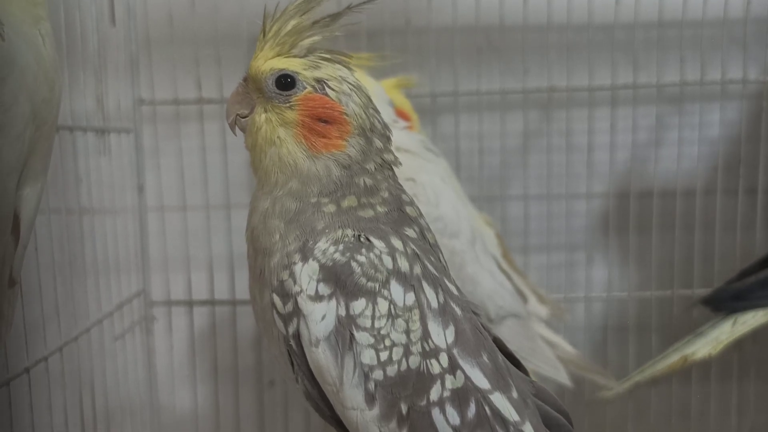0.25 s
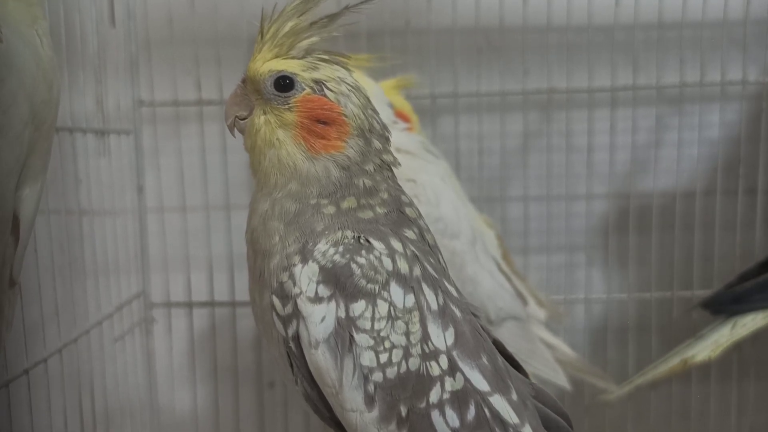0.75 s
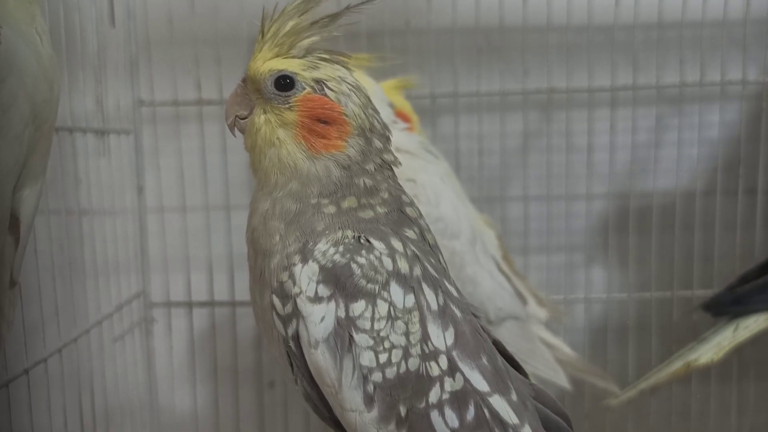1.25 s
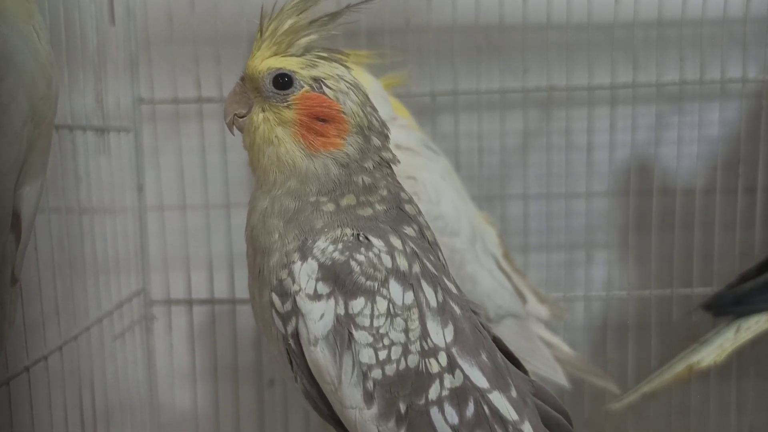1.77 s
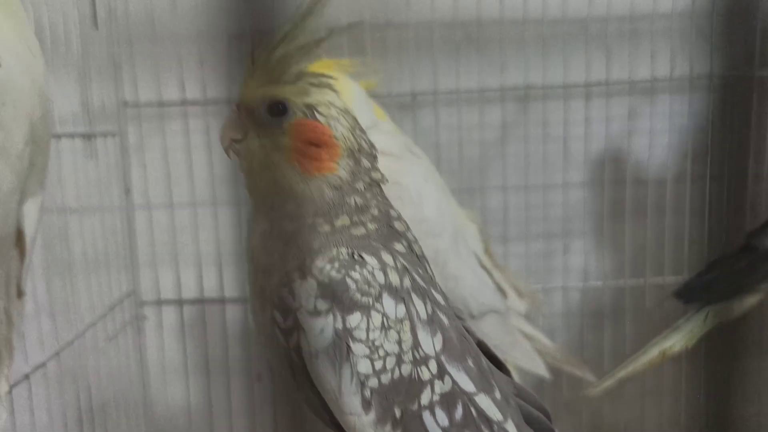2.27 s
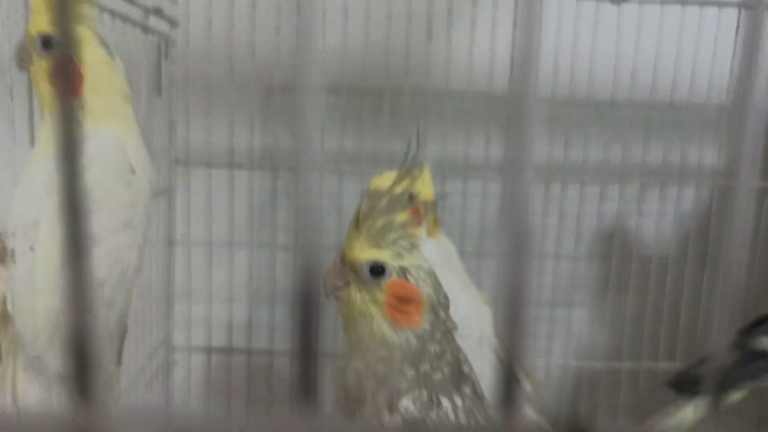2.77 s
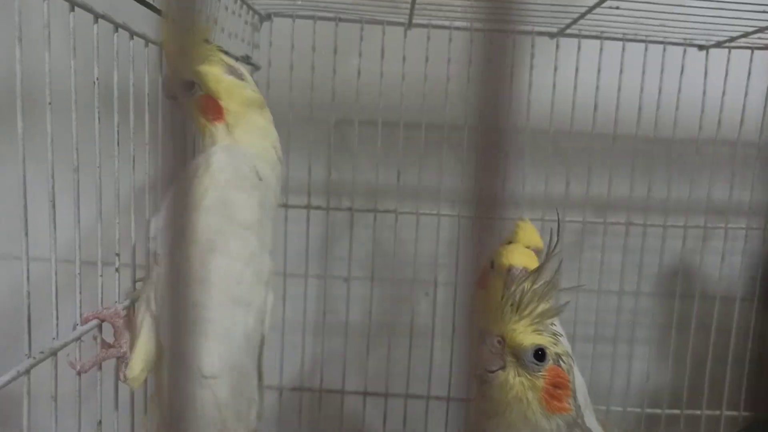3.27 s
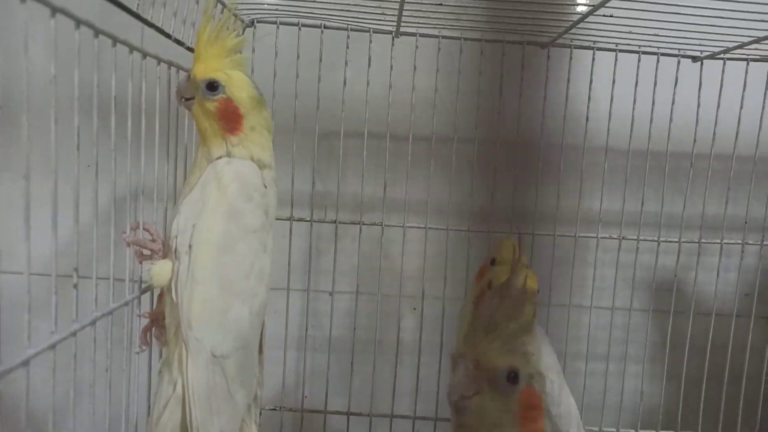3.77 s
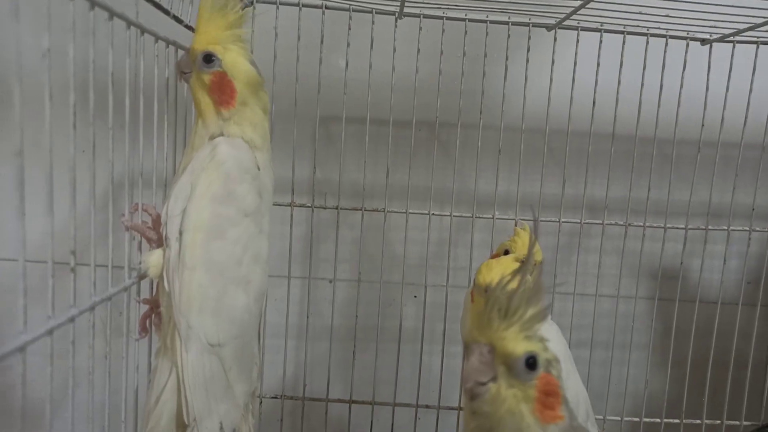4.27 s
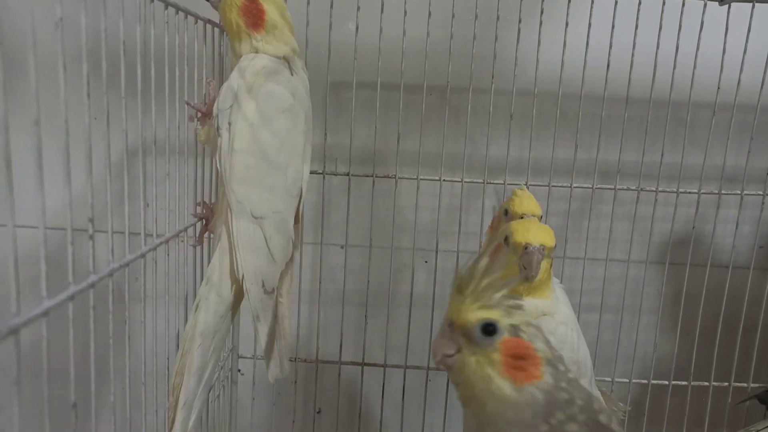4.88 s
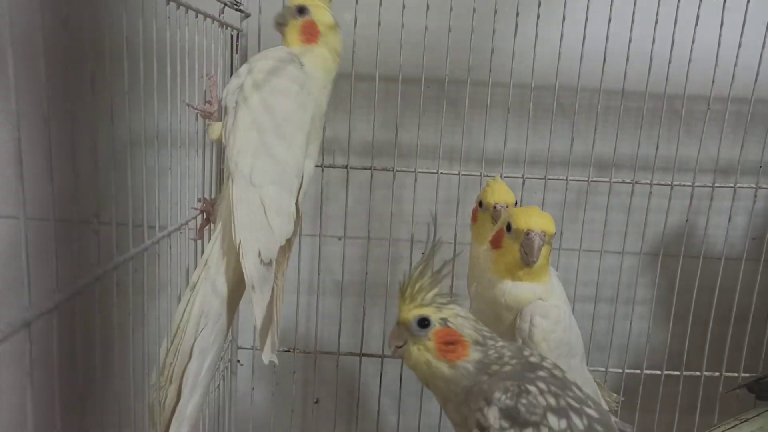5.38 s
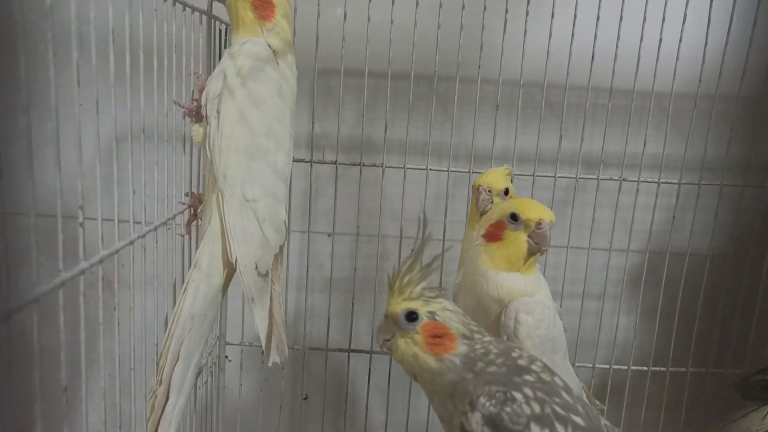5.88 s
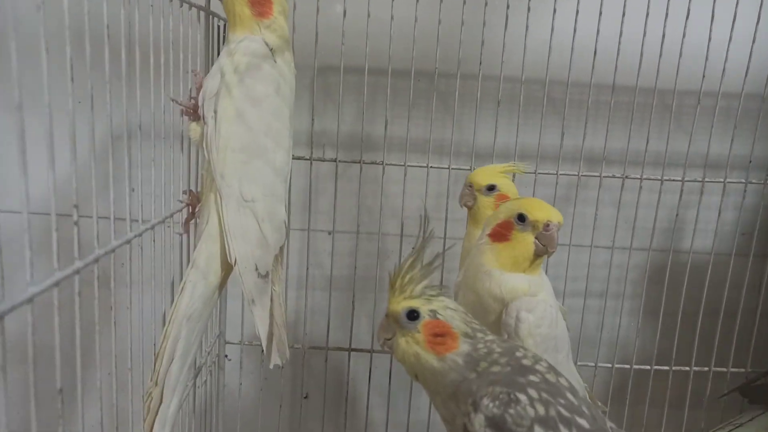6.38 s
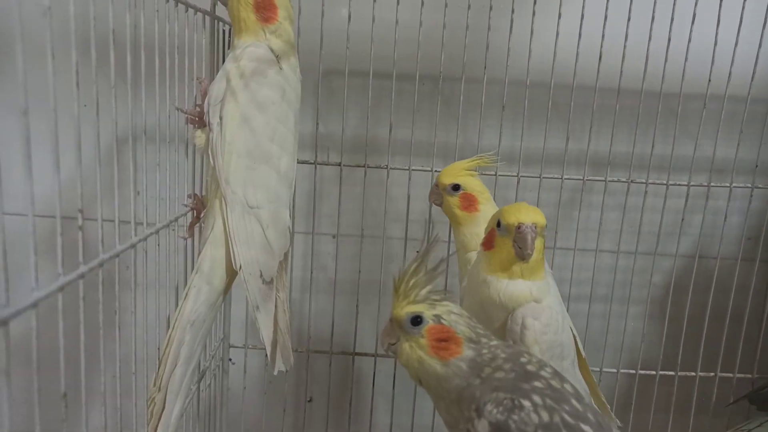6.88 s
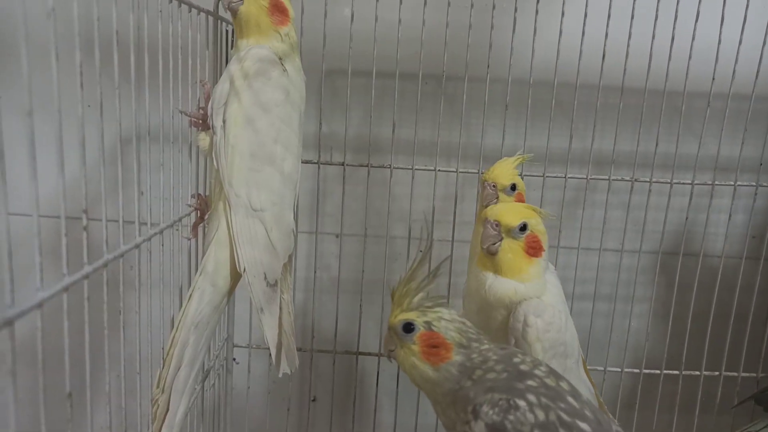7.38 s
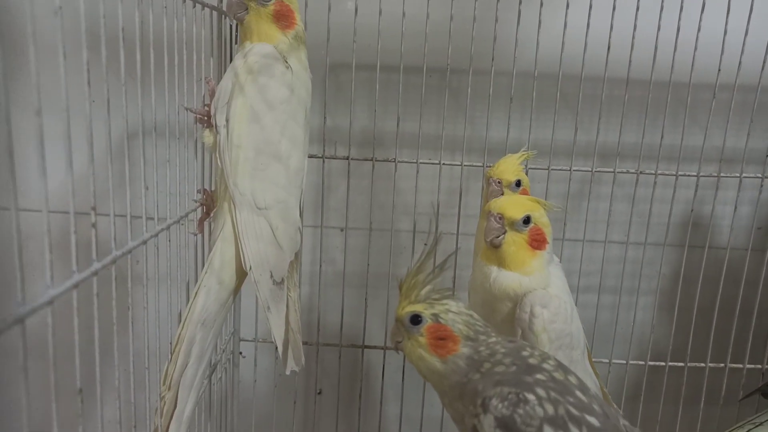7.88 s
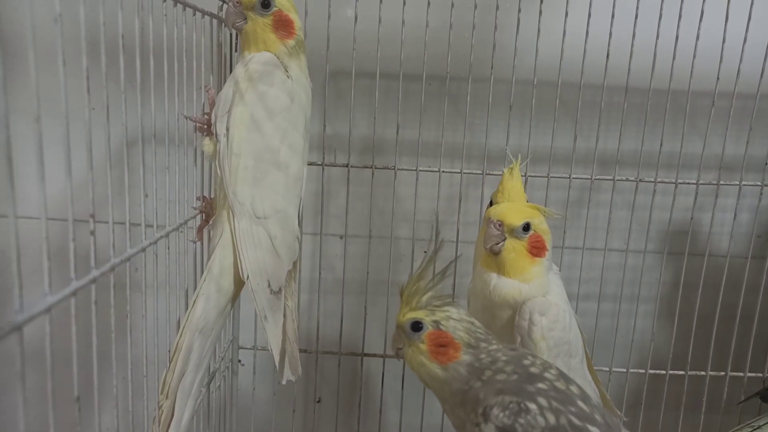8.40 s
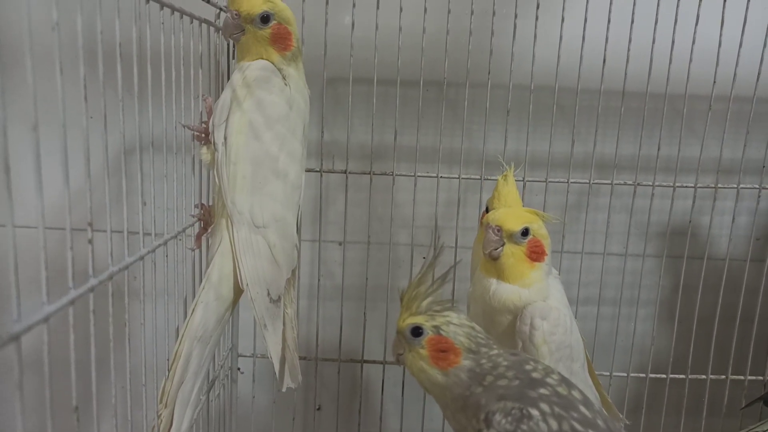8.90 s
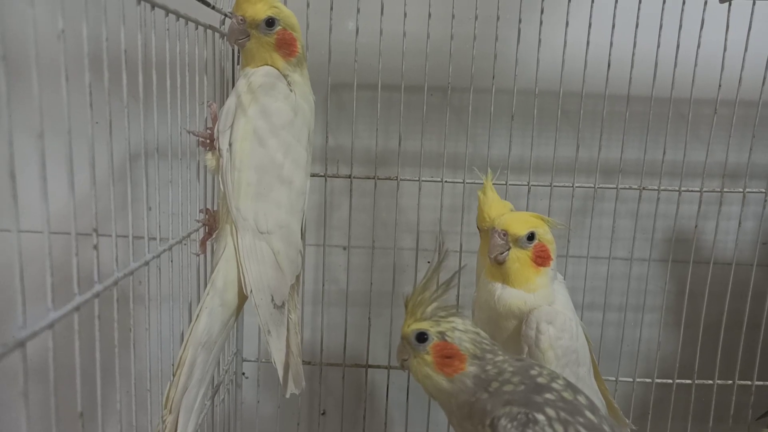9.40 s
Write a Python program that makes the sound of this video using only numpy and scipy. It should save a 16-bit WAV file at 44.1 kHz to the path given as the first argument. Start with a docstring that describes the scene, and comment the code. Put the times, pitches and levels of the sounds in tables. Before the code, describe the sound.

From 0 s several cockatiels call in a bare, reverberant room: clean whistles gliding around 1.5 to 4 kHz, overlapped by hoarse squawks and short bursts of bright hiss. At about 1 s a rising, fast-warbling trill joins, then louder calls near 1.7 s and a soft cage knock around 1.5 s. From roughly 2.1 to 3.1 s it falls quiet, with echoes fading, a light ringing knock at 2.4 s and faint low tones and weak peeps. At 3.2 s trills and sharp whistles return, scattered to 4.6 s, then crowd densely from 4.8 to 6.1 s, loudest and brightest near 5.3 s. A lull with faint low tones lasts until 7 s. Overlapping whistles resume; a dull low bang rolls at 7.8 s. Scattered chirps follow, two piercing ones near 8.9 s, then a pause and a last rising whistle at 9.5 s. Air, far birds and hiss continue throughout.

```python
"""Cockatiels call across one another in wire cages in a bare, echoing room.
From the start, clean whistles and hoarse squawks glide through a few harmonics, many along with short bursts of bright hiss.
After a second warbling trills join in, then soft knocks make the cages ring. A quiet spell follows with faint low tones.
Then the calls crowd in again and thin out; late on, one dull bang of low noise rolls through the room under the last calls.
Air, far birds and hiss, all made of noise, lie beneath it throughout."""
import sys
import numpy as np
from scipy import signal
from scipy.fft import rfft, irfft
from scipy.io import wavfile
from scipy.ndimage import uniform_filter1d

SR = 44100
rng = np.random.default_rng(int(sys.argv[2]) if len(sys.argv) > 2 else 0)


def transcribe(signal):
    """Save signal, clipped to [-1, 1], as a 16-bit WAV file at the path in sys.argv[1]."""
    frames = np.atleast_2d(signal).T
    limited = np.clip(frames, -1, 1)
    pcm = np.round(limited * 32767).astype(np.int16)
    wavfile.write(sys.argv[1], SR, pcm)


N = 425565   # length in samples


def from_db(db):
    """Turn decibels into a plain multiplier."""
    return 10 ** (np.asarray(db) / 20)


def rms_one(x):
    """Bring a signal to an average strength (RMS) of 1."""
    return x / np.sqrt(np.mean(x ** 2) + 1e-20)


def at_hz(points, hz):
    """Read a table of (Hz, value) at any frequency, on a logarithmic pitch scale."""
    table_hz, values = np.array(points).T
    return np.interp(np.log(hz + 1), np.log(table_hz), values)


def coloured(x, spectrum):
    """Make each frequency louder or softer by a (Hz, dB) table."""
    size = x.shape[-1]
    gain = from_db(at_hz(spectrum, np.fft.rfftfreq(size, 1 / SR)))
    return irfft(rfft(x) * gain, size)


def wobble(rate_hz, size):
    """Random wandering no faster than about rate_hz: low-passed noise of spread 1."""
    sos = signal.butter(3, rate_hz, fs=SR, output="sos")
    settled = signal.sosfilt(sos, rng.standard_normal(size + 4000))[4000:]
    return rms_one(settled)


def puff(start, length):
    """A loudness curve with a quick rise and a rounded fall."""
    age = np.clip(np.arange(N) / SR - start, 0, None) / max(length, .001)
    return (1 - np.exp(-age * 5)) * np.exp(-age ** 2)


# How much the left and right noise agree. Each row: frequency in Hz, likeness from 0 (unrelated) to 1 (same).
LIKENESS = [(60, 0.77), (290, 0.8), (700, 0.14), (1200, 0.16)]


def stereo_noise(size):
    """Two noise channels that agree in the bass and part in the treble."""
    mid, side = rfft(rng.standard_normal((2, size)))
    alike = np.clip(at_hz(LIKENESS, np.fft.rfftfreq(size, 1 / SR)), 0, 1)
    pair = np.sqrt(1 + alike) * mid + np.sqrt(1 - alike) * side * [[1], [-1]]
    return irfft(pair, size) / np.sqrt(2)


WARBLE_GROWS_S = .05   # time from none to full depth; a warble starts about a quarter of the way there
WARBLE_SNAP = 2.0      # the pitch dwells high and low and snaps between


def warble(age, depth, rate_hz, dip_loss_db):
    """The pitch swings up and down, and the loudness drops with each dip; gives pitch factor and loss in dB."""
    grown = np.clip(age / WARBLE_GROWS_S + 0.26, 0, 1)
    swing = -np.cos(2 * np.pi * rate_hz * age)      # starts at a dip
    swing = np.tanh(WARBLE_SNAP * swing) / np.tanh(WARBLE_SNAP)
    return 1 + depth * grown * swing, dip_loss_db * (1 - swing) / 2


# How the throat colours the voice. Each row: frequency in Hz, gain in dB.
THROAT = [(1200, -4), (1800, -5.5), (2500, -5), (3500, 0.5), (4300, 2.5), (5000, -11.5), (6500, -8.5),
          (8000, -21), (12000, -33.5), (16000, -36.5)]
# Overtones weaken as the pitch climbs above its turn and as the note goes on past it.
PURER_PER_OCTAVE_DB, PURER_PER_S_DB = 4, 29.5
HIGHER_STEP_DB = 1   # gain per harmonic above the third, before the throat


def harmonic_heights(k, glide, since_turn, turn_hz, second_db, third_db):
    """The syrinx sets the strength of each harmonic and the throat reshapes it; total power stays even."""
    purer_db = PURER_PER_OCTAVE_DB * np.log2(glide / turn_hz) + PURER_PER_S_DB * since_turn
    lower_db = (second_db - purer_db) * (k - 1)
    upper_db = third_db - purer_db + HIGHER_STEP_DB * (k - 3)
    source_db = np.where(k > 2, upper_db, lower_db)
    heights = from_db(source_db + at_hz(THROAT, k * glide)) * (k * glide < 11000)
    return heights / np.sqrt(np.sum(heights ** 2, axis=0))


ARCH_DB = 3.5       # a note is this much louder at its turn than along the line from start to end
BREATH_DB = -25.5   # air noise riding on a note, between its harmonics; a strained voice has more


def calls(notes, rough, jitter, edge_s, shake_hz):
    """The syrinx gives harmonics on a gliding pitch; hoarseness shakes both loudness and pitch.
    Returns what feeds the room and what is heard directly."""
    out = np.zeros((2, N))
    shake, waver = wobble(shake_hz, N), wobble(92.0, N)
    breath = from_db(BREATH_DB) * wobble(1236, N)
    k = np.arange(1, 8)[:, None]      # harmonic numbers
    for (start, turn, length, start_hz, turn_hz, end_hz, level_db, swell_db,
         second_db, third_db, near_db, *warbling) in notes:
        s = start + np.array([0, np.clip(turn, .002, length - .002), length])
        first, last = int((s[0] - edge_s) * SR), int((s[-1] + edge_s) * SR)
        i = np.arange(max(first, 0), min(last, N))
        t = i / SR
        glide = np.interp(t, s, [start_hz, turn_hz, end_hz])
        glide = uniform_filter1d(glide, size=500, mode="nearest")      # rounds the turn
        dip_db = 0
        if warbling:
            pitch_factor, dip_db = warble(t - start, *warbling)
            glide = glide * pitch_factor
        heights = harmonic_heights(k, glide, t - s[1], turn_hz, second_db, third_db)
        # a pressed, bright voice is the less steady one
        strain = 1 + .9 * np.minimum(heights[1] / heights[0], 1)
        phase = 2 * np.pi * np.cumsum(glide * (1 + jitter * strain * waver[i])) / SR
        wave = np.sum(heights * np.sin(k * phase), axis=0)
        fade = np.clip(np.minimum(t - s[0], s[-1] - t) / edge_s + 1, 0, 1) ** 2
        shape_db = np.interp(t, s, [-ARCH_DB - swell_db / 2, 0, -ARCH_DB + swell_db / 2])
        loudness = np.sqrt(2) * from_db(level_db + shape_db - dip_db) * fade
        unsteady = 1 + rough * np.sqrt(strain) * shake[i] + strain * breath[i]
        out[:, i] += loudness * unsteady * wave * from_db([[0], [near_db]])
    return out


# Clean whistles. Each row: start in seconds, turn after seconds, length in seconds,
# pitch at start, turn and end in Hz, level in dB, swell from start to end in dB,
# second harmonic in dB, third harmonic in dB, nearness as extra direct sound in dB.
WHISTLES = [ (0, 0.058, 0.16, 3438, 3353, 3223, -24, -1.5, -9, -32, 7.5),
            (.052, 0.052, 0.15, 2354, 2159, 2061, -24, -7, -8.5, -9.5, -6),
            (.38, 0.025, 0.044, 1626, 1848, 1926, -26, -4.5, -6, -6, 2.5),
            (.425, 0.025, 0.056, 1893, 2564, 2590, -29.5, -17.5, -14.5, -8.5, 3),
            (.765, 0.071, 0.084, 2847, 2417, 2266, -25.5, 9, -20, -19.5, -2.5),
            (.875, 0.021, 0.044, 2257, 1808, 1196, -36.5, -1, -30, -30, 5),
            (.912, 0.013, 0.044, 2800, 2940, 3080, -31.5, 6, -14, -23, -11),
            (.942, 0.02, 0.051, 3130, 3200, 3010, -22.5, -9, -12.5, -21, -5),
            (.98, 0.027, 0.048, 2300, 2224, 2015, -27, 2, -12.5, -25, 5),
            (1.26, 0.015, 0.034, 2590, 2305, 1950, -31, 2, 1, -2.5, 15),
            (1.43, 0.052, 0.11, 1499, 1690, 2155, -27.5, 1.5, -2, 0.5, -0.5),
            (1.54, 0.024, 0.034, 2770, 2985, 3070, -27.5, 3, -7, 5, -9),
            (1.652, 0.036, 0.075, 1903, 2129, 2134, -18, 0.5, 0, 4, -1),
            (1.735, 0.05, 0.084, 2128, 2125, 2070, -21.5, 7.5, 0.5, -13, -2),
            (1.82, 0.041, 0.069, 2700, 2437, 2226, -28, 13.5, -22, -11, -4),
            (3.14, 0.0076, 0.1, 1490, 1396, 1417, -49, -13, -6, -17, 2),
            (3.5, .02, 0.031, 3450, 3600, 3606, -19, 3, -7.5, -41, -1),
            (4.13, 0.025, 0.037, 1903, 1802, 1700, -31.5, 0, -14.5, -16, 6.5),
            (4.145, 0.014, 0.027, 3840, 3285, 2830, -36.5, -5.5, -9.5, -11, 3),
            (4.23, .025, 0.032, 1270, 1294, 1298, -40, 2.5, -32, -36, 1),
            (4.818, 0.042, 0.064, 1472, 1866, 2293, -25.5, 11.5, -2.5, -1, -6),
            (4.88, 0.027, 0.065, 2955, 2933, 2820, -30, 3, -22.5, -19, 2),
            (4.95, 0.033, 0.091, 1910, 1618, 1743, -31.5, 6.5, -14.5, -8.5, 1.5),
            (5.05, 0.032, 0.063, 1794, 2162, 1990, -17.5, -10.5, 2.5, -3, -7.5),
            (5.113, 0.077, .13, 2015, 1997, 1825, -22.5, -4.5, 2, -8, 2.5),
            (5.274, 0.027, 0.058, 2364, 2660, 3050, -21, -9, 9, 4.5, 1.5),
            (5.327, 0.011, 0.028, 3403, 3494, 3800, -16.5, -5, -6.5, -24, -1.5),
            (5.349, 0.03, 0.0545, 3860, 3720, 3467, -17, -1.5, -15.5, -44, 0),
            (5.422, 0.018, 0.049, 3445, 3547, 3473, -20.5, -1.5, -25, -36, 5),
            (5.448, 0.021, 0.051, 2294, 2980, 3100, -21, 5.5, -14, -28, 2.5),
            (5.512, 0.024, 0.059, 2970, 3142, 3064, -23.5, 6, -17.5, -30, 5),
            (5.636, 0.044, 0.13, 1807, 1936, 1677, -26, 1, -22.5, -30, 6.5),
            (5.975, 0.024, 0.099, 2990, 3247, 2917, -16.5, -1.5, -14.5, -29, -4),
            (6.625, 0.021, 0.03, 2390, 2486, 2420, -38, -11, -19, -13.5, 5.5),
            (6.685, 0.024, 0.056, 2244, 2060, 1990, -48, -8, -25, -14, 3),
            (7.005, 0.026, 0.084, 1596, 1736, 1670, -35, -16, -25, -27.5, 2.5),
            (7.005, 0.083, 0.14, 2970, 2697, 2176, -28.5, 6, -19, -16, 2),
            (7.27, 0.051, 0.08, 1922, 2296, 2920, -23.5, 14, -12.5, -15, -2.5),
            (7.34, 0.085, 0.17, 3008, 3180, 2960, -22.5, -3.5, -11, -35, -0.5),
            (7.33, 0.064, 0.15, 1607, 1947, 2360, -23, -1, 1, -1.5, -17),
            (7.72, 0.097, .13, 3060, 2495, 2087, -28, 1, -18, -9, 2.5),
            (7.925, 0.011, 0.031, 3720, 3395, 3104, -25.5, 9, -16.5, -23, 1.5),
            (7.952, 0.035, 0.064, 2750, 2050, 1640, -32, -1, -11, -27, 5),
            (8.15, 0.017, 0.031, 1496, 1370, 1320, -42.5, 13, -27.5, -20, 2),
            (8.203, 0.032, 0.085, 1761, 2300, 1523, -27, -0.5, -23, -24, 4.5),
            (8.285, 0.018, 0.052, 2160, 2395, 2430, -22.5, -7.5, -29, -26.5, 8.5),
            (8.56, 0.03, 0.06, 1710, 1513, 1380, -37, -1, -41, -41, 4),
            (8.625, 0.04, 0.07, 1443, 2270, 1956, -35, -0.5, -27.5, -28, 7),
            (8.706, 0.019, 0.029, 2553, 3400, 3480, -31, 17, -12, -35, 0),
            (8.74, 0.0078, 0.016, 3410, 3264, 2770, -22, 14, -20.5, -37, 8),
            (8.872, 0.027, 0.059, 3750, 3154, 3450, -15, 3, -13, -28, 5),
            (8.93, 0.042, 0.086, 3450, 3828, 3872, -14.5, 1.5, -10.5, -16, -1),
            (9.12, 0.016, 0.027, 1366, 1304, 1210, -44, 4, -10, -11, 14),
            (9.34, 0.0098, 0.043, 1210, 1153, 1150, -50, -12, -26, -24, 9),
            (9.48, 0.064, 0.15, 1685, 2290, 2577, -22, 6.5, -3, -3.5, -3.5), ]
# Rising calls that warble. Each row: the columns of a whistle, then warble depth as a share of the pitch,
# warble rate in Hz, loudness lost at each dip of the pitch in dB.
TRILLS = [ (1.043, 0.054, 0.091, 1698, 1842, 2295, -27.5, 16, -12, -4.5, 8, 0.039, 55.8, 4),
          (1.133, 0.037, 0.075, 2294, 2422, 3220, -25.5, -9, -8, -13, 11.5, 0.055, 52.3, 6),
          (3.242, 0.058, 0.14, 1548, 1701, 2617, -26, 18.5, -7.5, -4, 6, 0.028, 52.2, 4),
          (3.379, 0.047, 0.11, 2920, 3130, 3162, -19, -3, -13.5, -39, 6, 0.108, 52.8, 1),
          (4.37, 0.046, .1, 1375, 1693, 2243, -29, 4, -15.5, -18, 7, 0.056, 57.9, 3),
          (5.764, 0.034, 0.064, 1977, 2322, 2453, -17, 11.5, -24.5, -36, 4.5, 0.095, 53.7, 10), ]


def whistles_and_trills():
    """Clean voices: the syrinx moves steadily, so loudness and pitch shake little."""
    return calls(WHISTLES + TRILLS, rough=.16, jitter=.005, edge_s=.004, shake_hz=150)


# Hoarse squawks. Each row: start in seconds, turn after seconds, length in seconds,
# pitch at start, turn and end in Hz, level in dB, swell from start to end in dB,
# second harmonic in dB, third harmonic in dB, nearness as extra direct sound in dB.
SQUAWKS = [ (0, 0.014, 0.029, 2358, 2244, 1904, -28, 11.5, -5.5, 2.5, -8),
           (0, 0.032, 0.062, 2920, 2780, 2650, -27.5, 1, -7, -18, 4.5),
           (.17, 0.015, 0.048, 2507, 2651, 2623, -22.5, -4, -13.5, -15.5, -3),
           (.437, 0.07, 0.16, 3130, 2862, 2773, -33.5, -10, -18, -15, 1),
           (1.98, 0.046, 0.084, 3220, 2256, 1595, -37.5, 11, -5, -34, -3),
           (1.99, 0.032, 0.056, 2300, 2216, 1880, -30.5, -9, -3, -7, 3),
           (2.562, 0.021, 0.023, 1540, 1443, 1330, -46.5, -12, -26, -20, 9),
           (2.67, 0.018, 0.023, 1290, 1307, 1290, -49.5, -11, -35, -17, 2),
           (2.8, 0.023, 0.095, 1388, 1394, 1302, -50, -12, -12, -20.5, 1),
           (2.91, 0.013, 0.028, 1614, 1795, 1980, -50, -10, -31.5, -12, 6.5),
           (3.02, 0.014, 0.035, 1283, 1343, 1380, -49.5, -24.5, -30, -33, -9),
           (3.47, 0.057, 0.12, 1700, 1905, 2440, -31, 17.5, -6, -5.5, 4),
           (3.57, 0.037, 0.076, 3193, 3227, 3150, -24, -14.5, -9, -39, -7),
           (3.64, 0.045, 0.11, 2000, 2449, 2212, -29.5, 11, -8.5, -6.5, 5),
           (3.93, 0.035, 0.061, 2050, 1856, 1743, -32, 0.5, -7, -3, -2),
           (3.98, .02, 0.021, 2304, 2335, 2300, -34.5, 3, 13, -16, 14.5),
           (4.03, 0.027, 0.057, 2300, 2348, 1569, -33, 5, -25, -25, 4.5),
           (5.39, 0.02, 0.052, 3250, 2296, 1715, -27.5, -7, -21.5, -9, -5),
           (6.02, 0.032, 0.052, 2932, 2278, 1560, -26.5, -27, -16, -29, -3),
           (6.12, 0.049, 0.098, 2150, 2335, 2376, -37.5, -1, -7, -7.5, 5),
           (7.1, 0.041, .11, 1750, 1970, 2300, -32, 8, -7.5, -1, -5),
           (7.17, 0.026, 0.083, 3100, 3270, 3220, -29, -5, -15, -28, -2),
           (7.44, 0.029, 0.086, 2490, 2494, 2550, -30.5, -1, -7, -10, 6),
           (7.9, 0.056, 0.065, 3096, 3460, 3240, -39, 18, 3.5, -28, -5),
           (8.915, 0.021, 0.055, 2190, 2260, 2320, -30.5, -8, 0.5, -15, 0), ]


def squawks():
    """Hoarse voices: loudness and pitch shake hard and fast."""
    return calls(SQUAWKS, rough=0.74, jitter=0.01415, edge_s=0.0074, shake_hz=400)


# Short bursts of bright hiss. Each row: start in seconds, level in dB (lowered by 10 below), length in seconds.
HISS_BURSTS = [(0.377, -20.5, 0.07), (0.804, -40.5, 0.063), (0.977, -31, 0.037), (1.06, -36, 0.065),
               (1.429, -29, 0.042), (1.631, -25, 0.04), (2.43, -51, 0.031), (2.654, -56, 0.036),
               (2.9, -49, 0.027), (3.235, -24.5, 0.05), (3.288, -28, 0.16), (3.988, -29, 0.059),
               (4.13, -27.5, 0.05), (4.376, -26.5, 0.089), (4.644, -22.5, 0.036), (4.826, -30.5, 0.062),
               (5.025, -32.5, 0.056), (5.27, -18.5, 0.048), (5.652, -28.5, 0.18), (5.769, -21.5, 0.066),
               (5.967, -19, 0.05), (7.008, -36.5, 0.19), (7.292, -35, .055), (7.7966, -42, 0.05),
               (8.278, -21.5, 0.046), (8.718, -25.5, 0.028), (8.859, -27.5, 0.034), (9.483, -36, 0.1)]
# Colour of the bursts. Each row: frequency in Hz, level in dB per Hz.
HISS_BURST_COLOUR = [(1000, -18), (3000, 3), (7000, -8), (12000, 11), (16000, 14)]
PATCHY_DB = 5   # how unevenly the narrow bands swell and fade


def hiss_bursts():
    """Short bursts of bright, patchy hiss, many along with loud calls: grainy noise in uneven narrow bands."""
    level = sum(from_db(db - 10.0) * puff(s, length) for s, db, length in HISS_BURSTS)
    grains = rng.standard_normal(N) * from_db(1.6 * wobble(300, N))
    grains = rms_one(coloured(grains, HISS_BURST_COLOUR))
    patches = from_db(PATCHY_DB * np.array([wobble(15.2, N) for _ in range(5)]))
    edges = np.geomspace(1000, 16500, 25)
    noise = np.zeros(N)
    for k, pair in enumerate(zip(edges, edges[1:])):
        sos = signal.butter(2, pair, "band", fs=SR, output="sos")
        noise += patches[k % 5] * signal.sosfilt(sos, grains)      # every fifth band shares a patch
    return level * rms_one(noise)


# Soft knocks on the cages. Each row: time in seconds, level in dB (raised by 7.5 below).
KNOCKS = [(1.487, -46), (2.443, -41.5), (4.05, -50), (5.199, -53)]
# Tones at which a cage rings. Each row: frequency in Hz, level in dB, time to fade by 60 dB in seconds.
CAGE = [(318, -1, 0.039), (506, -10.5, 0.019), (1800, -8.5, .012), (3730, 5, 0.0092)]


def knocks():
    """Each knock sets all the cage's tones ringing, each with a strength of its own."""
    s, knock_db = np.transpose(KNOCKS)
    scatter_db = rng.normal(0, 3, (len(s), len(CAGE)))
    out = np.zeros(N)
    for k, (hz, level_db, t60) in enumerate(CAGE):
        clicks = np.full(N, 1e-18)      # not quite zero, which keeps the filter fast
        clicks[(s * SR).astype(int)] = from_db(knock_db + level_db + 7.5 + scatter_db[:, k])
        r, w = from_db(-60 / (t60 * SR)), 2 * np.pi * hz / SR      # fade and turn per sample
        out += signal.lfilter([0, np.sin(w)], [1, -2 * r * np.cos(w), r * r], clicks)
    return out


# Colour of the bang. Each row: frequency in Hz, level in dB per Hz.
BANG_COLOUR = [(40, -43), (80, -6), (160, 3.5), (320, -4), (700, -1), (1300, -10), (3000, -10), (8000, -21)]
BANG_S, BANG_DB, BANG_LENGTH_S = 7.782, -23, .06


def bang():
    """A dull slam: a short rumble of noise."""
    rumble = rms_one(coloured(rng.standard_normal(N), BANG_COLOUR))
    return from_db(BANG_DB) * puff(BANG_S, BANG_LENGTH_S) * rumble


# Faint low tones that swell and fade. Each row: start in seconds, frequency in Hz, level in dB, length in seconds.
LOW_TONES = [(2.447, 283, -54, 0.14), (2.686, 250.7, -60.5, 0.35), (4.513, 472.3, -51, 0.18),
             (4.555, 274.5, -48, 0.15), (5.173, 299.5, -58, 0.12), (5.6, 248.5, -47.5, 0.071),
             (6.2, 469, -50.5, 0.083), (6.131, 274, -45, 0.14), (6.237, 646, -52, 0.15),
             (6.486, 143.7, -64, 0.74)]


def low_tones():
    """Sine waves whose fluttering loudness widens them into narrow bands."""
    t = np.arange(N) / SR
    flutter = from_db(5.3 * wobble(61, N) - 1.5)
    tones = sum(from_db(db) * puff(s, length) * np.sin(2 * np.pi * hz * t)
                for s, hz, db, length in LOW_TONES)
    return flutter * tones


# Colour of the background. Each row: frequency in Hz, level in dB per Hz.
AIR_COLOUR = [(24, -41.5), (40, -6), (101, 6.5), (263, 2.5), (1090, -10), (2120, -0.5), (4600, -14.5),
              (5370, -46.5), (6550, -9.5), (8000, -40.5), (10400, -66), (17600, -120)]
# Slow swell of the background. Each row: time in seconds, gain in dB.
AIR_SWELL = [(0, -5.5), (3.5, -1), (6, -1), (9.65, 3)]
# Far birds come and go. Each row: time in seconds, gain of the background's treble in dB.
FAR_SWELL = [(2.3, 6), (2.6, -1), (3.302, 2.5), (6.2, 16.5), (6.6, -12), (7, -14), (7.301, -6)]
AIR_DB, HISS_DB = -47, -53   # before the swells
FAR_ABOVE_HZ = 1100


def air():
    """Room tone and far birds: coloured noise that slowly swells, over a steady hiss."""
    t = np.arange(N) / SR
    swell_db = np.interp(t, *np.transpose(AIR_SWELL)) + 0.92 * wobble(3.3, N)
    tone = rms_one(coloured(stereo_noise(N), AIR_COLOUR)) * from_db(AIR_DB + swell_db)
    treble_only = signal.butter(2, FAR_ABOVE_HZ, "high", fs=SR, output="sos")
    far = signal.sosfiltfilt(treble_only, tone)
    far_gain = from_db(np.interp(t, *np.transpose(FAR_SWELL)))
    tone = tone + far * (far_gain - 1)      # the treble is already in once
    return tone + from_db(HISS_DB) * rng.standard_normal((2, N))


# How long the echoes last. Each row: frequency in Hz, time to fade by 60 dB in seconds.
ROOM_T60 = [(100, 1), (1400, 1), (4000, 0.78), (7000, 0.68), (14000, 0.13)]


def room(x, gap_s):
    """Echoes off the walls as a dense noise tail; each octave dies at its own pace, evened out in energy."""
    size = int(1.5 * SR)
    t, hz = np.arange(size) / SR, np.fft.rfftfreq(size, 1 / SR)
    echoes, tail = rfft(stereo_noise(size)), 0
    for centre in 62.5 * 2. ** np.arange(9):
        band = np.cos(np.pi / 2 * np.clip(np.log2((hz + 1) / centre), -1, 1)) ** 2
        dying = from_db(-60 * t / at_hz(ROOM_T60, centre))
        tail = tail + irfft(echoes * band, size) * dying / np.sqrt(np.sum(dying ** 2))
    tail = tail * np.clip(t / gap_s - 1, 0, 1)      # the first walls answer after a gap
    return signal.fftconvolve(x[None], tail, axes=1)[:, :N]


LEFT_LAG = 15   # samples by which direct sound reaches the left later


def scene():
    """Mix the direct sound, its echoes and the background."""
    spread, straight = (whistles_and_trills() + squawks()
                        + hiss_bursts() + knocks() + bang() + low_tones())
    direct = np.stack([np.roll(straight, LEFT_LAG), straight])
    return from_db(1.5) * direct + from_db(8.5) * room(spread, gap_s=0.0006) + air()


# Overall colour of the sound. Each row: frequency in Hz, gain in dB.
OVERALL_COLOUR = [(4300, -0.5), (5500, -4.5), (7500, 3.5), (12000, -4)]
GAP_HZ = 8750, 11450   # a band of treble left nearly empty
CUTOFF_HZ = 15850      # almost nothing is left above this


def record(dry):
    """The overall colour of the sound: peaks rounded, rumble, one treble band and the top cut."""
    x = .85 * np.tanh(coloured(dry, OVERALL_COLOUR) / .85)
    x = signal.sosfilt(signal.butter(2, 70, "high", fs=SR, output="sos"), x)
    x = signal.sosfilt(signal.cheby2(6, 28, GAP_HZ, "bandstop", fs=SR, output="sos"), x)
    return signal.sosfilt(signal.cheby2(14, 70, CUTOFF_HZ, fs=SR, output="sos"), x)


dry = scene()
out = record(dry)
transcribe(out)
```